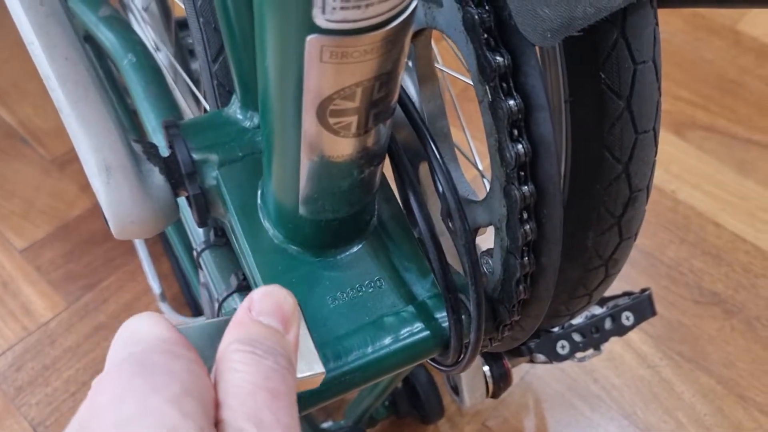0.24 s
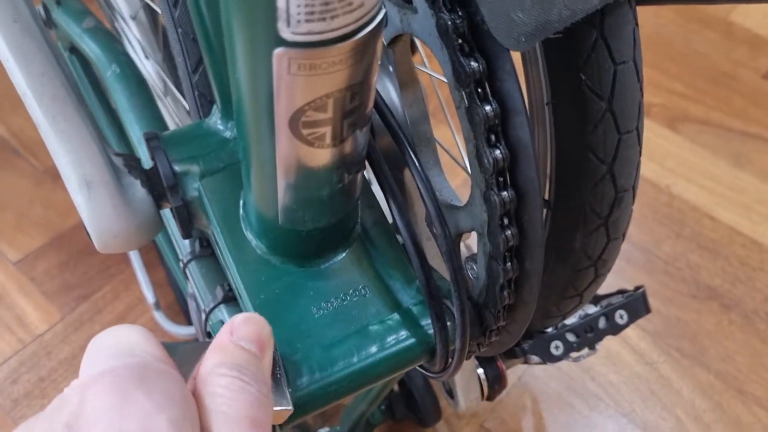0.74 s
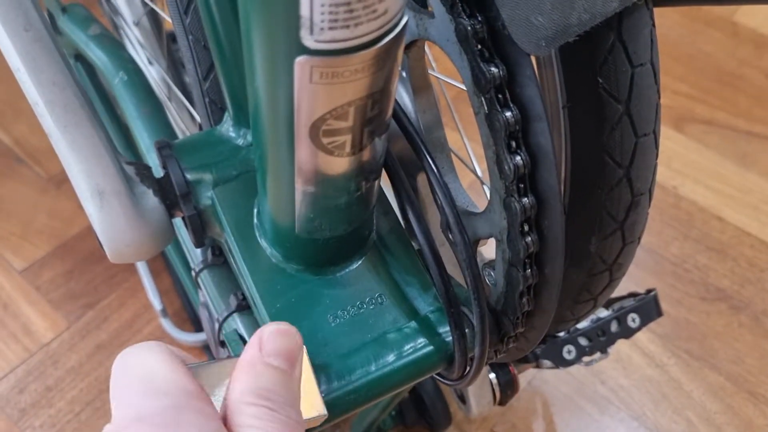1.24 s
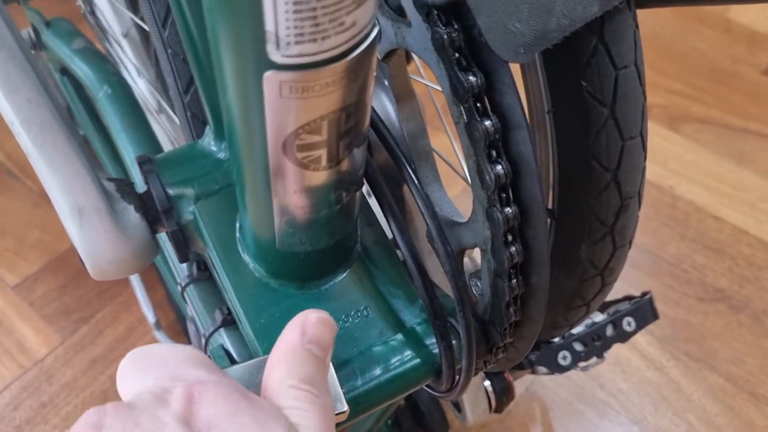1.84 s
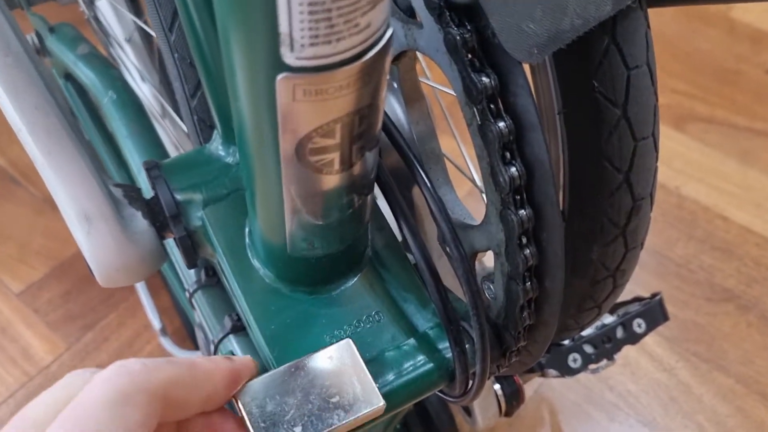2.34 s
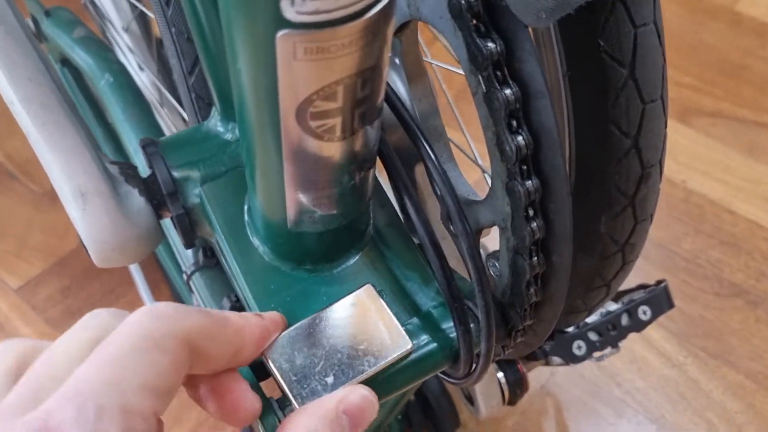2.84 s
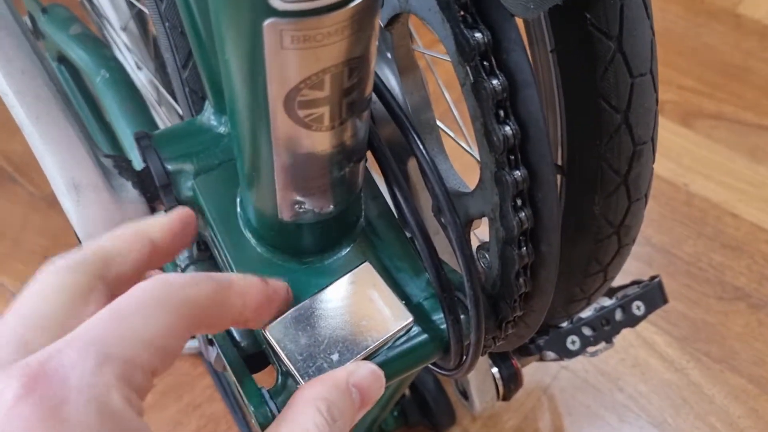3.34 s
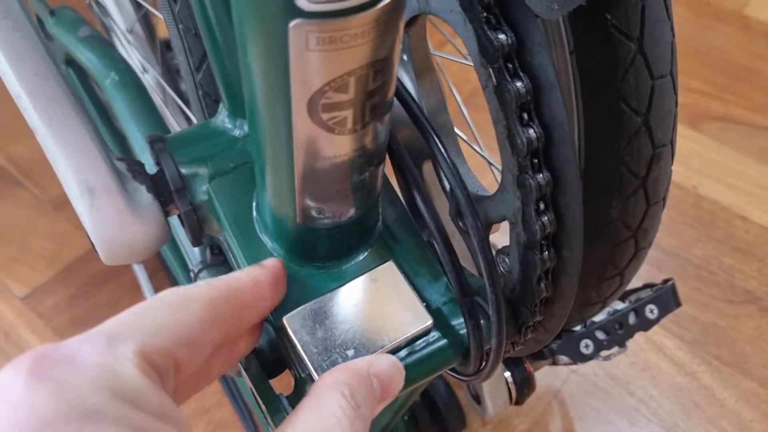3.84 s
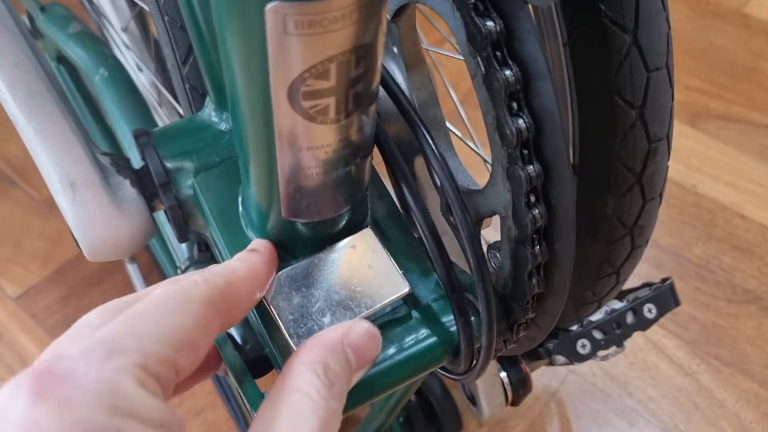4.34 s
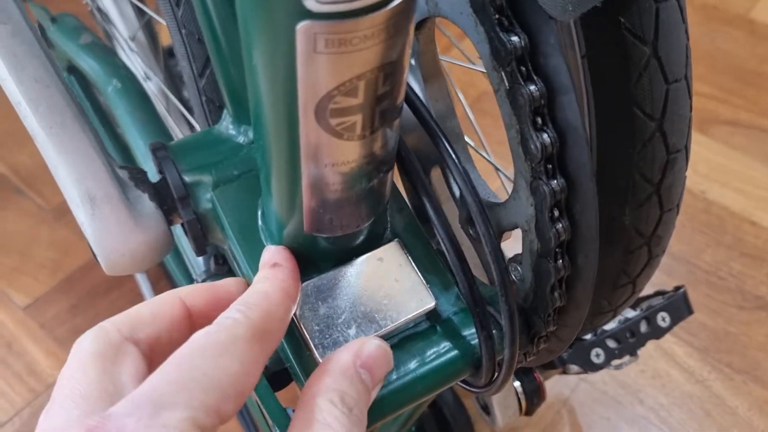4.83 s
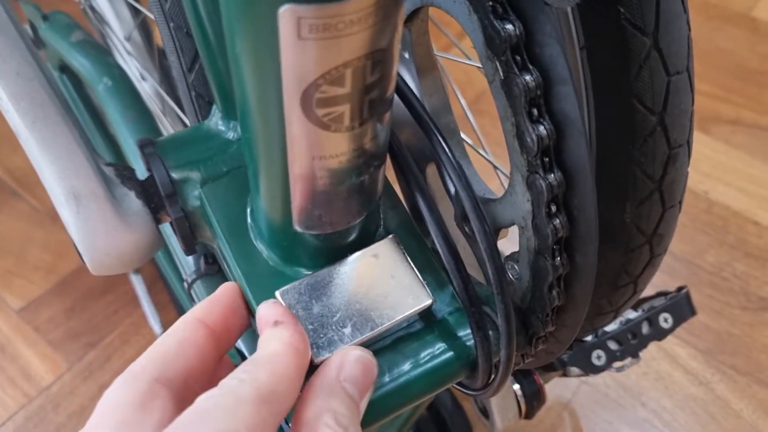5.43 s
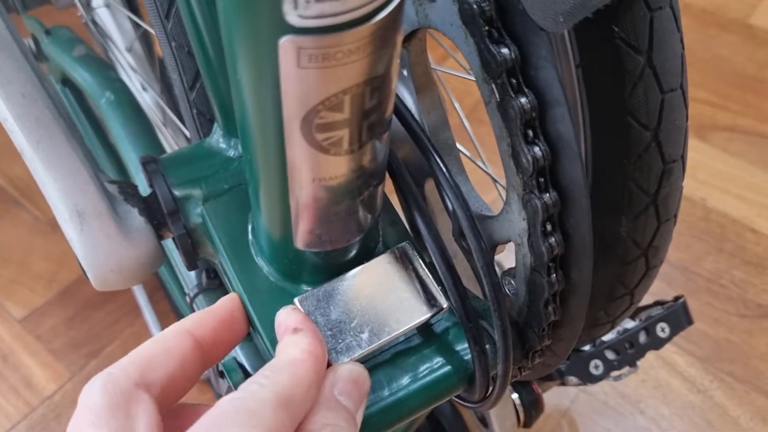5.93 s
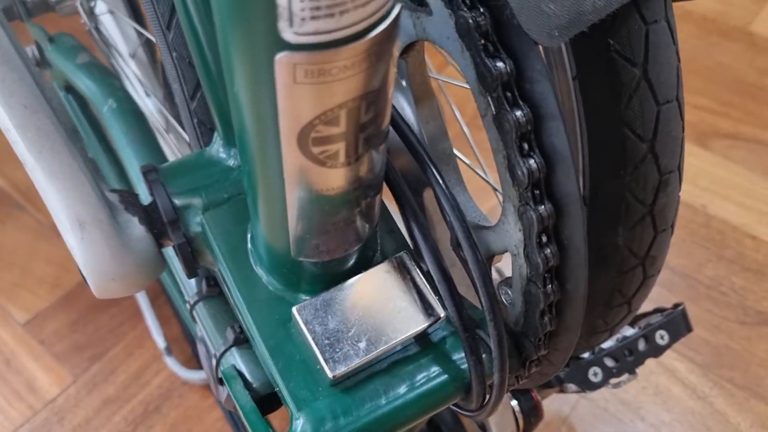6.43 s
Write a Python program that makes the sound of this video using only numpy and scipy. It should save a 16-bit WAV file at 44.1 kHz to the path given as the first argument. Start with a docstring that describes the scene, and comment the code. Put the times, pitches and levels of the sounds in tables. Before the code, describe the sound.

Close, sharp steel-on-steel snaps ring briefly through a bicycle frame in a small room, with finger taps, low hum and a very faint clock.

```python
"""Magnet snapping onto a bicycle frame

In a living room a hand shifts a strong block magnet over a steel frame. Three times it snaps down hard:
each contact is a burst of dying noise plus short rings of steel wall and magnet and longer frame tones.
Taps and scrapes are short filtered noise, the room is a noise tail, and a sleeve swishes as shaped noise.
A low drone with a drifting pitch and an uneven level lies beside a steady hum, rumble and hiss, then
dies away; a faint clock is made of tiny damped rings."""
import sys
import numpy as np
from scipy import signal
from scipy.fft import rfft, irfft, next_fast_len
from scipy.io import wavfile

SR = 44100
rng = np.random.default_rng(int(sys.argv[2]) if len(sys.argv) > 2 else 0)


def transcribe(u):
    """Save the signal u as a 16-bit wav file named by the first command-line argument.

    u: samples, shape (n,) or (channels, n), limited to [-1, 1]; the rate is SR.
    q: integer samples, one column per channel.
    """
    v = np.clip(np.atleast_2d(u).T, -1, 1)
    q = np.round(v * 32767).astype(np.int16)
    wavfile.write(sys.argv[1], SR, q)


N = 294367
TIME = np.arange(N) / SR


def from_db(db):
    """Turn decibels into a gain."""
    return 10 ** (np.asarray(db) / 20)


def lean(db):
    """Gains for left and right that make left louder by db."""
    return from_db([[db / 2], [-db / 2]])


def unit_energy(x):
    """Scale a sound so that its energy, averaged over the channels, is 1."""
    return x / np.sqrt(np.mean(np.sum(x ** 2, axis=-1)) + 1e-30)


def in_time(points):
    """Read a (time, value) curve at every sample."""
    s, value = np.transpose(points)
    return np.interp(TIME, s, value)


def at_hz(points, hz):
    """Read a (frequency, value) curve on a logarithmic frequency axis."""
    f, value = np.transpose(points)
    return np.interp(np.log(np.maximum(hz, 1)), np.log(f), value)


def dying(t, t60):
    """Exponential decay that falls by 60 dB in t60 seconds."""
    return np.exp(-np.log(1000) * t / t60)


def sine(hz, t):
    """Steady tone that starts at a separate random point of its cycle in each channel."""
    return np.sin(2 * np.pi * hz * t + rng.uniform(0, 2 * np.pi, (2, 1)))


def butter(x, hz, kind, order=2):
    """Smooth (Butterworth) filter that keeps the low part or a band."""
    sections = signal.butter(order, np.clip(hz, 10, .45 * SR), kind, fs=SR, output="sos")
    return signal.sosfilt(sections, x)


def resonance(x, hz, octaves, order=2):
    """One broad resonance around a pitch, scaled to energy 1."""
    half_width = 2 ** (octaves / 2)
    return unit_energy(butter(x, [hz / half_width, hz * half_width], "band", order=order))


def flutter(hz):
    """Random wavering no faster than about hz, with spread 1."""
    return unit_energy(butter(rng.standard_normal(N), hz, "low")) * np.sqrt(N)


def add(track, s, sound):
    """Mix a sound into a track from time s."""
    i = int(round(s * SR))
    track[:, i:i + sound.shape[1]] += sound[:, :N - i]


# how alike noise is at the two microphones: (frequency [Hz], left-right likeness [-1 to 1])
LIKENESS = [(60, .96), (130, .75), (260, .15), (600, -.25), (2000, -.3), (5000, -.05), (12000, .05)]


def pair_spectrum(spectrum, size):
    """Coloured noise at two spaced microphones: a shared part and an opposite part, as Fourier bins."""
    hz = np.fft.rfftfreq(size, 1 / SR)
    mid, side = rfft(rng.standard_normal((2, size)))
    alike = np.clip(at_hz(LIKENESS, hz), -1, 1)
    shared = np.sqrt(1 + alike) * mid
    opposite = np.sqrt(1 - alike) * side * [[1], [-1]]
    return hz, from_db(at_hz(spectrum, hz)) * (shared + opposite)


def steady_noise(spectrum):
    """Unchanging coloured stereo noise of rms 1."""
    _, bins = pair_spectrum(spectrum, size=next_fast_len(N))
    return unit_energy(irfft(bins)[:, :N]) * np.sqrt(N)


def dying_noise(spectrum, t60s, size, count=18):
    """Countless modes struck at once: noise bands that each die at their own rate, total energy 1."""
    hz, bins = pair_spectrum(spectrum, size=size)
    t, out = np.arange(size) / SR, 0
    edges = np.geomspace(90, 17000, count + 1)
    for low, high in zip(edges, edges[1:]):
        t60 = at_hz(t60s, np.sqrt(low * high))
        band = irfft(bins * ((hz >= low) & (hz < high)))
        out = out + band * dying(t, t60) / np.sqrt(t60)  # a slow decay gains no extra energy
    return unit_energy(out)


def clack(t, hz, ring_ms, linger_db=-7.0, linger_t60=0.045):
    """A damped ring peaks after ring_ms, a weaker part lingers; left and right are out of step."""
    age = 1000 * t / ring_ms
    out_of_step = np.array([[0], [rng.choice([-1, 1]) * 1.75]])
    phase = rng.uniform(0, 2 * np.pi) + out_of_step
    swell = unit_energy(age * np.exp(-age))
    linger = unit_energy((1 - np.exp(-age)) * dying(t, linger_t60))
    shape = swell + from_db(linger_db) * linger
    return unit_energy(shape * np.sin(2 * np.pi * hz * t + phase))


# low drone: (time [s], pitch [Hz]) and (time [s], rms level [dB])
DRONE_PITCH = [(0.0, 69.5), (0.4, 69.5), (0.47, 65.5), (0.77, 74.5), (2.64, 76), (2.81, 70.5), (3.37, 75.5),
               (4.6, 69)]
DRONE_LEVEL = [(0.0, -50), (0.4, -54.5), (0.51, -83.5), (0.55, -67), (0.69, -49.5), (1.65, -42),
               (1.95, -54.5), (2.22, -48.5), (2.29, -64), (2.54, -46), (2.64, -57.5), (2.72, -45.5),
               (2.82, -65.5), (2.86, -55), (3.3, -51.5), (3.42, -43.5), (4.5, -48), (4.6, -63.5)]
# faint steady hum: (frequency [Hz], rms level [dB])
HUM = [(60, -61), (125.5, -69)]
# colour of the bass rumble and of the thin hiss: (frequency [Hz], relative level [dB per Hz])
RUMBLE = [(12, -55), (20, -25.5), (41, -11), (62, -2.5), (86, -9), (97, -18), (130, -14), (157, -22),
          (270, -26.5), (374, -24.5), (404, -32.5), (540, -28), (693, -32), (2000, -51.5), (2600, -87),
          (4400, -120)]
HISS = [(800, 7.5), (1800, 1.5), (3200, -0.5), (4700, -7.5), (7300, -4.5), (9000, -13), (15500, -15)]
# strength of the hiss: (time [s], level [dB])
HISS_LEVEL = [(0, -75), (2.1, -73.5), (3.4, -80.5), (6.67, -85.5)]


def background(drone_fade_s=0.14, rumble_db=-55):
    """A low drone with a drifting pitch and an uneven level beside hum, rumble and hiss, then dying away."""
    fade = np.exp(-np.maximum(TIME - DRONE_LEVEL[-1][0], 0) / drone_fade_s)
    cycles = np.cumsum(in_time(DRONE_PITCH)) / SR
    tones = from_db(in_time(DRONE_LEVEL)) * fade * np.sin(2 * np.pi * cycles)
    for hum_hz, hum_db in HUM:
        tones = tones + from_db(hum_db) * np.sin(2 * np.pi * (hum_hz * TIME + rng.random()))
    rumble = from_db(rumble_db) * steady_noise(RUMBLE)
    hiss = from_db(in_time(HISS_LEVEL)) * steady_noise(HISS)
    return np.sqrt(2) * tones + rumble + hiss  # the root of 2 turns rms into peak


# the clock's beat: (first tick [s], tick to tock [s], tick to next tick [s])
CLOCK = (0.134, 0.492, 0.9525)


def clock(tick_db=-50, case_hz=2210, ring_ms=5.5, size=4096):
    """A far clock ticks with a slight limp; each beat is one damped ring of its case."""
    out, t = np.zeros((2, N)), np.arange(size) / SR
    first_s, tock_s, period_s = CLOCK
    for s in np.arange(first_s, N / SR - tock_s, period_s):
        for beat_s in (s, s + tock_s):
            add(out, beat_s, from_db(tick_db) * clack(t, case_hz, ring_ms))
    return out


# pushes of the magnet over the paint: (time [s], energy [dB], time to the peak [s], pitch [Hz])
SLIDES = [(0.356, -31, 0.011, 4500), (0.430, -31.5, 0.032, 2570), (0.469, -41.5, 0.059, 7000),
          (1.281, -22.5, 0.006, 2750), (3.408, -43.5, 0.0085, 6004), (3.732, -40.5, 0.004, 2300),
          (5.706, -43, 0.016, 8000), (5.712, -47, 0.012, 2150)]


def slides(octaves=0.45, grain_db=4.5, catch_hz=300, size=16384):
    """Short scrapes: gritty friction swells as the magnet gives way and fades as it grips again."""
    out, t = np.zeros((2, N)), np.arange(size) / SR
    for s, db, peak_s, hz in SLIDES:
        speed = t / peak_s * np.exp(-t / peak_s)
        grit = rng.standard_normal((2, size)) * from_db(grain_db * flutter(catch_hz)[:size])
        add(out, s, from_db(db) * resonance(speed * grit, hz, octaves, order=1))
    return out


# light knocks and taps of hand, fingers and nails, plus one low knock as the frame rocks after the last snap:
# (time [s], energy [dB], pitch [Hz])
TICKS = [ (0.361, -29, 2870), (0.364, -18.5, 157), (0.3704, -40, 12500), (0.417, -20, 2440),
         (0.427, -23.5, 1250), (0.459, -28, 1500), (0.470, -22, 410), (0.527, -24.5, 452),
         (0.636, -29, 700), (0.679, -37.5, 1500), (1.2957, -31.5, 13150), (1.3207, -32, 6300),
         (3.369, -50, 5005), (3.393, -49, 5902), (3.7336, -29, 6400), (3.995, -19, 310), (4.720, -55, 6500),
         (4.900, -56, 6500), (5.180, -50.5, 5200), (6.2572, -35, 850), (6.6159, -17.5, 5100), ]


def touches(octaves=1.2, narrowing=0.35, longest_t60_s=0.11, halving_hz=1300, size=8192):
    """Small taps: a noise burst in one broad resonance; a harder tap is higher, narrower and shorter."""
    out, t = np.zeros((2, N)), np.arange(size) / SR
    for s, db, hz in TICKS:
        hardness = hz / halving_hz  # at 1 the decay time is half the longest
        burst = rng.standard_normal((2, size)) * dying(t, longest_t60_s / (1 + hardness))
        add(out, s, from_db(db) * resonance(burst, hz, octaves / hardness ** narrowing))
    return out


# the frame's ringing tones: (frequency [Hz], decay t60 [s],
# energy against the crack at spot 1 [dB], spot 2 [dB], spot 3 [dB])
FRAME = [ (546, 0.16, -23, -27.5, -30.5), (760, 0.44, -25, -32.5, -37), (807.8, 0.68, -25, -26, -34),
         (1146, 0.33, -24.5, -31, -42), (1319, 0.26, -20, -24.5, -24), (1632.1, 0.55, -26.5, -26, -23.5),
         (1698, .5, -28, -24, -33.5), (1995, 0.41, -30.5, -30, -26), (2255, 0.23, -18.5, -31, -29.5),
         (2590, 0.3, -20, -30.5, -22), (2697, .75, -39, -29, -27), (2765, .33, -16.5, -26, -38),
         (3050, 0.37, -30, -25.5, -24), (3130, 0.21, -24.5, -22, -42), (3610, 0.36, -25, -24, -20),
         (3660, .12, -30.5, -17, -24), (4060, 0.27, -27.5, -28.5, -13.5), (4030, 0.41, -24, -24, -16.5),
         (4440, .2, -25, -19.5, -26.5), (4918, .28, -27.5, -19.5, -38), (5136, 0.37, -29.5, -19, -19.5),
         (6560, .22, -18.5, -27, -16.5), (6940, 0.23, -36.5, -17, -31), (7587, 0.25, -42, -24.5, -22.5), ]


def frame_ring(t, spot):
    """The tubes ring in many tones; each spot on the frame wakes them in its own shares."""
    out = 0
    for hz, t60, *spot_db in FRAME:
        out = out + from_db(spot_db[spot]) * unit_energy(dying(t, t60) * sine(hz, t))
    return out


def fittings(t, t60=0.15, spread_db=1.0, count=48):
    """Spokes, chain ring and guards sing along in thin tones, higher ones dying sooner; energy 1."""
    out = 0
    for hz in np.geomspace(1300, 9000, count) * rng.uniform(.97, 1.03, count):
        mode = sine(hz, t) * dying(t, t60 * (3000 / hz) ** .3)  # t60 holds at 3000 Hz
        out = out + from_db(spread_db * rng.standard_normal()) * mode
    return unit_energy(out)


# colour of the steel-on-steel crack, before it is shaped further:
# (frequency [Hz], relative level at spot 1 [dB per Hz], spot 2 [dB per Hz], spot 3 [dB per Hz])
CRACK = [(100, -18.5, -25, -24), (183, -14.5, -12.5, -11.5), (240.2, -4.5, -8.5, -7), (416, -23, -21, -7),
         (747, -2, -4.5, -9.5), (1150, -5.5, -3, -9), (1653, 1.5, -2.5, -1), (2690, 4, -1.5, 3.5),
         (4201.6, -0.5, -0.5, -1), (5370, 0, -2, 0.5), (6430, -3.5, -1, 1.5), (7950, 0, 0.5, 0),
         (9700.6, -2, -3.5, -8.5), (10400, -10.5, -11, -11), (15110, -12.5, -6, -6.5)]
# how fast the crack dies: (frequency [Hz], decay t60 [s])
CRACK_T60 = [(200, 0.32), (700, 0.19), (2000, 0.039), (6000, 0.029), (14000, 0.039)]


def crack_noise(spot, thud_db, thud_hz=600, seat_s=0.0004, size=32768):
    """The crack of steel on steel: dying noise with a softened start and its low part turned by thud_db."""
    crack = dying_noise(np.array(CRACK)[:, [0, spot + 1]], CRACK_T60, size=size // 4)
    crack = np.pad(crack, [(0, 0), (0, size - crack.shape[1])])
    crack = crack * (1 - np.exp(-np.arange(size) / SR / seat_s))  # the paint gives a little
    return crack + (from_db(thud_db) - 1) * butter(crack, thud_hz, "low", order=1)


# magnet meets frame, edge first and face after; energies before the thud, wall and sharpness settings:
# (time [s], crack energy [dB], sharpness as low-pass edge [Hz],
#  steel wall ring [Hz], magnet ring [Hz], magnet ring energy [dB])
CONTACTS = [ (0.4142, -11.5, 1730, 2200, 3390, -18.5), (0.523, -25.5, 3300, 2200, 3340, -36.5),
            (1.645, 7.5, 3630, 2350, 4226, 1.5), (1.6483, 8.5, 4400, 2600, 6510, 3),
            (2.6146, -13, 8990, 3750, 7430, -9), (2.6218, 10.5, 10000, 3100, 7650, 5.5),
            (2.639, -5.5, 9000, 3770, 7100, 5.5), (2.6434, 8.5, 14000, 3698, 7800, 8),
            (3.9650, -7, 6000, 3600, 6530, -11), (3.9716, -0.5, 5010, 2850, 1499, -15),
            (3.9728, 4, 11000, 3670, 6060, 2), (3.9766, -3.5, 12000, 4550, 6500, 9),
            (3.9947, -16, 5000, 3560, 6820, -11), ]
# front edge, middle of the plate, near the upright tube: (used from time [s], gain of the thud [dB],
# wall ring against the crack [dB], left minus right [dB], feed to the room [dB])
SPOTS = [(0, 3.5, -4, 2.5, -10), (2.2, -7.5, -6.5, -0.4, -2.5), (3.5, -2, -1, -3, -2)]


def magnet(rings_send_db=-9.5, frame_send_db=-6.5, fittings_db=-15.5, size=32768):
    """Each contact cracks, rings wall and magnet and wakes the frame; returns direct sound and room feed."""
    ring_ms_at_0_db, ring_halving_db = 0.8, 15
    direct, feed, t = np.zeros((2, N)), np.zeros((2, N)), np.arange(size) / SR
    sympathy = from_db(fittings_db) * fittings(t)
    frames = [frame_ring(t, spot) + sympathy for spot in range(len(SPOTS))]
    for s, db, sharp_hz, wall_hz, magnet_hz, magnet_db in CONTACTS:
        spot = np.searchsorted([row[0] for row in SPOTS], s) - 1
        _, thud_db, wall_db, pan_db, room_db = SPOTS[spot]
        crack = crack_noise(spot, thud_db, size=size)
        # a finger in the way blunts the blow
        crack, frame = from_db(db) * butter([crack, frames[spot]], sharp_hz, "low")
        # a harder contact clamps the rings sooner
        ring_ms = ring_ms_at_0_db * 2 ** (-max(db, magnet_db) / ring_halving_db)
        wall_ring = from_db(db + wall_db) * clack(t, wall_hz, ring_ms)
        magnet_ring = from_db(magnet_db) * clack(t, magnet_hz, ring_ms)
        rings = wall_ring + magnet_ring
        add(direct, s, (crack + frame + rings) * lean(pan_db))
        # the magnet's flat face beams its ring forward, so less of it reaches the walls
        sent = crack + from_db(frame_send_db) * frame + from_db(rings_send_db) * rings
        add(feed, s, from_db(room_db) * sent)
    return direct, feed


# the room's echo tail: (frequency [Hz], decay t60 [s]) and (frequency [Hz], relative level [dB per Hz])
ROOM_T60 = [(150, 0.05), (500, 0.64), (1400, 0.4866), (3500, 0.4152), (7000, 0.39), (10000, 0.3441),
            (15000, 0.2)]
ROOM_COLOUR = [(150, -3), (500, -9), (1200, -4), (2500, 2), (4500, 4), (7500, -3), (14000, 1)]


def room(feed, build_s=0.0043, near_db=-5.0, near_t60=0.086, size=40000):
    """Floor and bicycle parts answer with a short noise tail, the walls with a longer, coloured one."""
    t = np.arange(size) / SR
    walls = dying_noise(ROOM_COLOUR, ROOM_T60, size=size)
    near = from_db(near_db) * unit_energy(rng.standard_normal((2, size)) * dying(t, near_t60))
    answer = (walls + near) * (1 - np.exp(-t / build_s))
    return signal.fftconvolve(feed, answer, axes=1)[:, :N]


# two strokes of the sleeve as the arm draws back: (time of the peak [s], level before grain and pan [dB])
STROKES = [(6.42, -51.5), (6.62, -55.5)]
# colour of the cloth noise: (frequency [Hz], relative level [dB per Hz])
SWISH = [(180, -36.5), (300, -5.5), (366, -7), (769, -7), (1260, -4), (1420, 2.5), (1590, -4), (2610, -8),
         (2930, -3), (4280, -10), (4880, -7), (7020, -11.5), (8420, -19), (13600, -19), (15500, -24)]


def sleeve(stroke_s=0.085, grain_db=1.0, grain_hz=120, pan_db=0.7):
    """Cloth slides over cloth: noise swells and fades with each stroke as fibres catch unevenly."""
    speed = sum(from_db(db) * np.exp(-((TIME - s) / stroke_s) ** 2) for s, db in STROKES)
    grain = from_db(grain_db * flutter(grain_hz))
    return speed * grain * steady_noise(SWISH) * lean(pan_db)


def scene(touch_room_db=-12.0):
    """Magnet and fingers close by, with the room, sleeve, clock and background around them."""
    direct, feed = magnet()
    taps = touches() + slides()
    echoes = room(feed + from_db(touch_room_db) * taps)
    return background() + clock() + taps + direct + echoes + sleeve()


# difference in colour between the two microphones: (frequency [Hz], left minus right [dB])
BALANCE_DB = [(60, 0.37), (130, 1), (280, 2), (600, -0.5), (1100, 1.5), (4000, 1), (7000, 4.5),
              (10000, -3.5), (14000, -2)]


def record(dry, cutoff_hz=15850):
    """The two microphones differ in colour, the highest peaks are rounded and the top is cut."""
    size = next_fast_len(N + 4096)
    lean_db = at_hz(BALANCE_DB, np.fft.rfftfreq(size, 1 / SR)) * np.array([[.5], [-.5]])
    heard = irfft(rfft(dry, size) * from_db(lean_db), size)[:, :N]
    rounded = heard / (1 + heard ** 4) ** .25
    return signal.sosfilt(signal.ellip(12, .1, 80, cutoff_hz, fs=SR, output="sos"), rounded)


dry = scene()
out = record(dry)
transcribe(out)
```